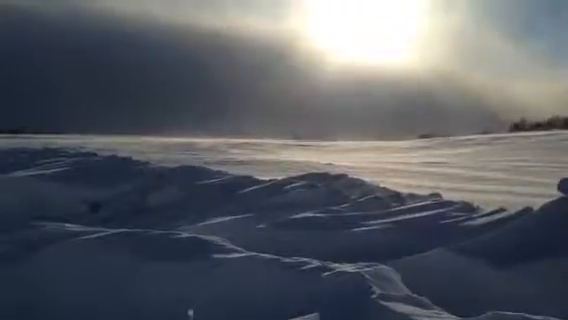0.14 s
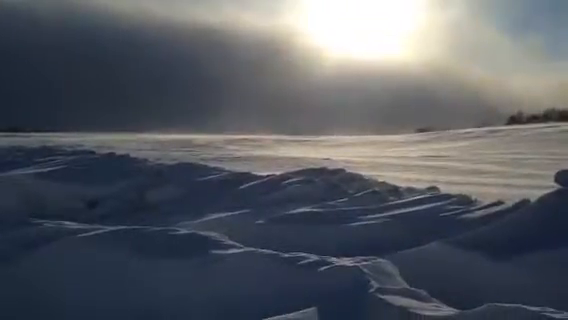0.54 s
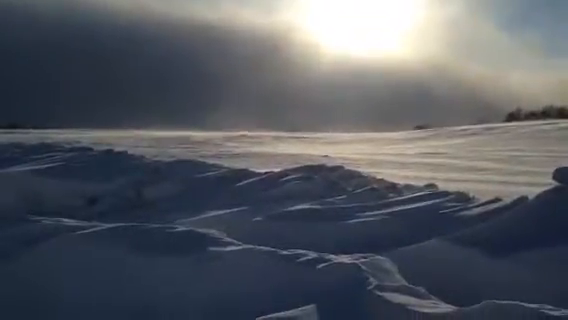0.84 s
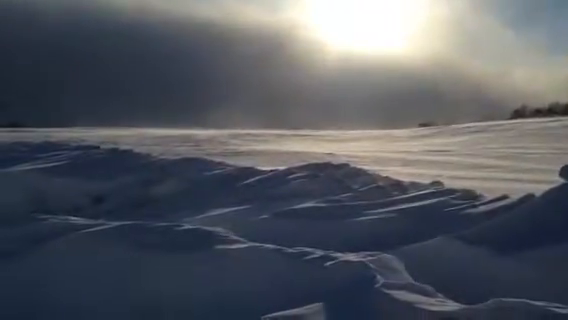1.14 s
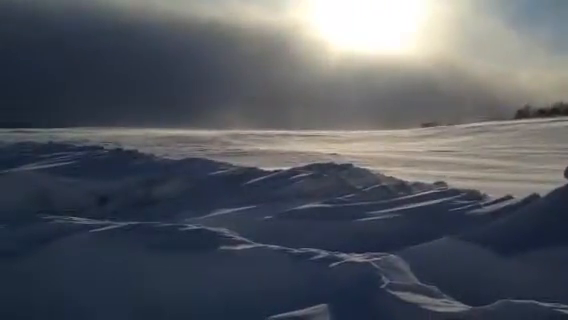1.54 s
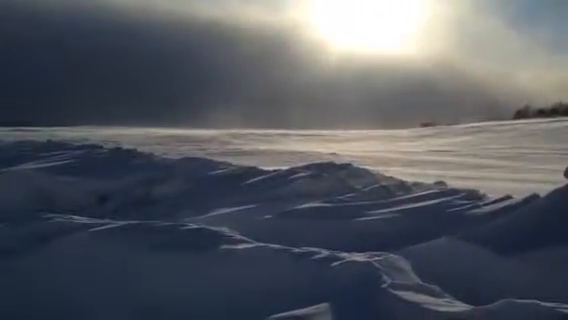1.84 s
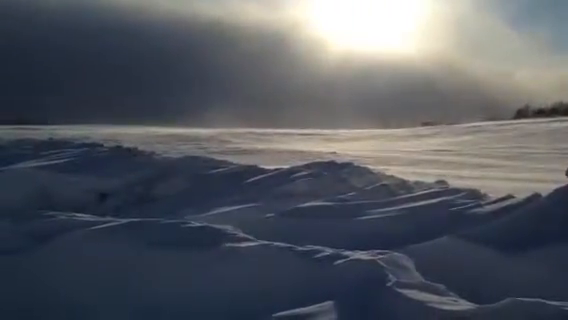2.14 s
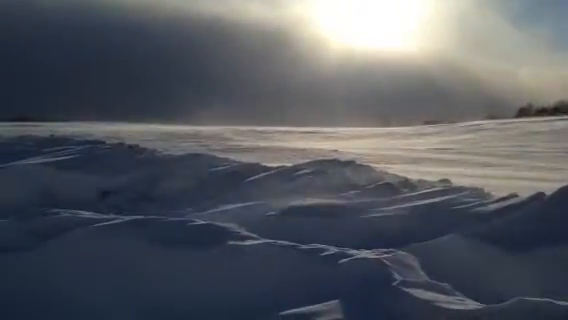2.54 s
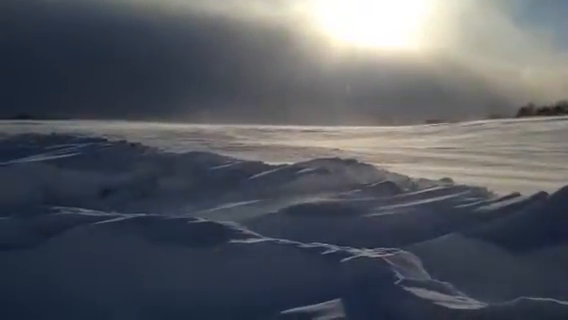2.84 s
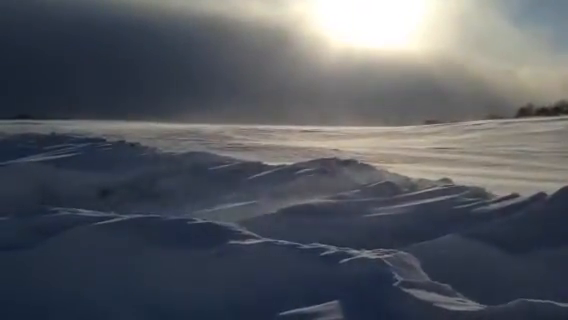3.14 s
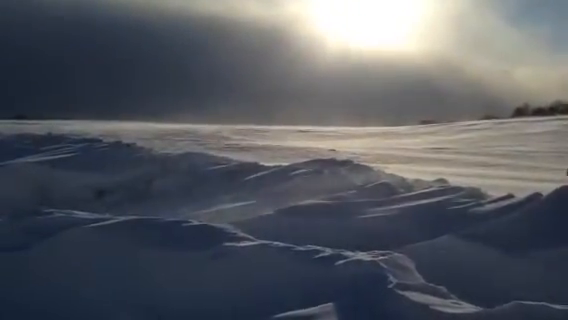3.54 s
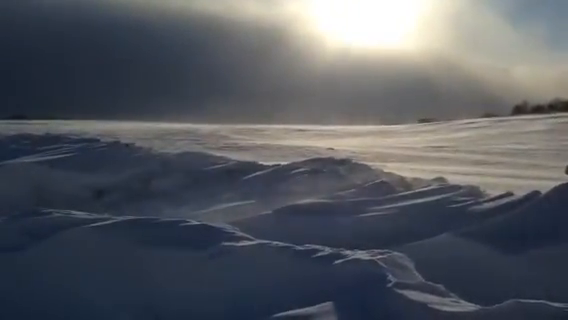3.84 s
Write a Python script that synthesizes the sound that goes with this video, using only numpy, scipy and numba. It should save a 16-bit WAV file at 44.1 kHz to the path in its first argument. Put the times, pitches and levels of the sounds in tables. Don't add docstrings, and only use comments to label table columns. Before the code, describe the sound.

Gusty wind buffets a microphone with low thumps, then blows harder with rough hollow hoots.

```python
import sys
import numpy as np
from scipy import signal
from scipy.io import wavfile
from scipy.ndimage import uniform_filter1d
from numba import njit

SR = 44100
rng = np.random.default_rng(int(sys.argv[2]) if len(sys.argv) > 2 else 0)


def amplitude_ratio(level_db):
    exponent = np.asarray(level_db, float) / 20
    return 10 ** exponent


def log_audio(samples):
    frames = np.atleast_2d(samples).T
    limited = np.clip(frames, -1, 1)
    pcm = np.round(limited * 32767).astype(np.int16)
    wavfile.write(sys.argv[1], SR, pcm)


N = 176400


def curve(rows, col):
    rows = np.array(rows, float)
    return np.interp(np.arange(N) / SR, rows[:, 0], rows[:, col])


def unit(x):
    return x / np.sqrt(np.mean(x ** 2))


def white():
    return rng.standard_normal(N)


def walk(rate_hz):
    hold = int(SR / rate_hz)
    levels = rng.standard_normal(N // 200)[:N // hold + 1]
    steps = np.repeat(levels, hold)
    return 0.83 * uniform_filter1d(uniform_filter1d(steps, hold), hold)[:N]


def low(x, hz, order=4):
    return signal.sosfilt(signal.butter(order, hz, fs=SR, output="sos"), x)


@njit
def svf(x, hz, width_hz):
    y, band_state, low_state = np.empty(len(x)), 0., 0.
    for i in range(len(x)):
        g = np.tan(np.pi * hz[i] / SR)
        damping = width_hz / hz[i]
        v = (band_state + g * (x[i] - low_state)) / (1 + g * (g + damping))
        band_state = 2 * v - band_state
        low_state += 2 * g * v
        y[i] = damping * v
    return y


def band(x, hz, width_hz):
    return svf(x, np.clip(hz * np.ones(N), 20, .45 * SR), float(width_hz))


def band2(x, hz, width_hz):
    return band(band(x, hz, width_hz), hz, width_hz)


@njit
def puffs(at_s, hz, cycles, size, phase):
    y = np.zeros(N)
    for e in range(len(at_s)):
        sigma_s = cycles[e] / hz[e] / 3
        first = max(0, int((at_s[e] - 4 * sigma_s) * SR))
        last = min(N, int((at_s[e] + 4 * sigma_s) * SR))
        for i in range(first, last):
            u = i / SR - at_s[e]
            bell = np.exp(-.5 * (u / sigma_s) ** 2)
            y[i] += size[e] * bell * np.sin(2 * np.pi * hz[e] * u + phase[e])
    return y


def bells(at_s, db, sigma_s):
    t = np.arange(N) / SR
    return sum(amplitude_ratio(d) * np.exp(-.5 * ((t - a) / sigma_s) ** 2) for a, d in zip(at_s, db))


# time in seconds, buffet level in dB.
GUST = [(0.0, -32.5), (0.31, -32), (0.49, -29.5), (0.82, -34.5), (1.26, -35.5), (1.5, -26), (1.67, -24),
        (1.97, -29), (2.08, -26), (2.33, -30.5), (2.74, -28), (3.13, -28), (3.27, -28.5), (3.54, -25.5),
        (3.66, -30), (3.81, -28.5), (4.0, -31.5)]


def buffet():
    eddies_per_s, centre_hz, scatter_db, cycles = 330, 135, 3, 1.5
    gap, pitch, size, phase = rng.random((2400, 4)).T
    at_s = np.cumsum(-np.log(gap)) / eddies_per_s
    hz = centre_hz * np.exp(0.59 * 2.68 * (pitch - .5))
    size = amplitude_ratio(-scatter_db * np.log(size))
    small = puffs(at_s, hz, cycles + 0 * at_s, size, 2 * np.pi * phase)
    return unit(small) * amplitude_ratio(curve(GUST, 1) + 1.0)


# frequency in Hz, density in dB per Hz.
SNOW_SPECTRUM = [(200, -10.5), (600, -13), (1050, -8.5), (1700, -28), (3000, -30.5), (5000, -44.5),
                 (9000, -59)]
# time in seconds, level in dB.
SNOW_LEVEL = [
    (0, -45.5),
    (1.2, -46),
    (1.8, -49.5),
    (2.5, -52),
    (2.7, -47),
    (3.2, -55),
    (4, -66.5),
]


def snow():
    hz_table, db_table = np.array(SNOW_SPECTRUM, float).T
    out, swell = 0, walk(2.4)
    for hz in 200 * 2 ** np.arange(0, 5.5, 1 / 3):
        db = np.interp(np.log(hz), np.log(hz_table), db_table) + 10 * np.log10(hz)
        noise = low(band2(white(), hz, hz / 3), 1.19 * hz)
        out = out + unit(noise) * amplitude_ratio(db + 1.3 * swell + 0.66 * walk(11.0))
    return unit(out) * amplitude_ratio(curve(SNOW_LEVEL, 1))


# centre in Hz, width in Hz, level in dB.
SELF_NOISE = [(5460, 5400, -80), (8300, 8200, -88.5), (12200, 11000, -85), (14000, 3000, -83)]


def self_noise():
    hiss = sum(amplitude_ratio(db) * unit(band2(white(), hz, width_hz)) for hz, width_hz, db in SELF_NOISE)
    gain_db = curve([(0, 3.5), (1.2, 0.5), (2.0, 3.5), (2.58, 6), (2.63, -2), (4, 1)], 1)
    return hiss * amplitude_ratio(gain_db)


# time in seconds, peak in dB, pitch in Hz.
EDDIES = [(0.056, -24.5, 91), (0.099, -13.5, 136), (0.1, -14, 230), (0.128, -28, 443),
          (0.128, -20.5, 199.4), (0.142, -10.5, 205.6), (0.156, -19.5, 118.3), (0.314, -21, 215),
          (0.316, -15, 102), (0.495, -13, 236.7), (0.499, -32, 108), (0.536, -21, 110),
          (0.541, -12, 210), (0.542, -31.5, 362), (0.588, -19, 113), (0.649, -24, 402),
          (0.652, -9.5, 224), (0.662, -18, 110), (0.663, -21, 360), (0.678, -12.5, 231.6),
          (1.352, -10, 118.1), (1.356, -22, 205), (1.375, -12.5, 108),
          (1.464, -20, 92), (1.612, -16, 133.6), (1.707, -29, 126), (1.708, -15, 235),
                 (1.709, -17.5, 383), (1.753, -13, 92), (1.776, -12.5, 259), (1.78, -17, 130.6),
                 (1.809, -8.5, 85), (1.842, -17, 506), (1.857, -16, 252), (1.994, -11.5, 380),
                 (1.995, -13, 264), (1.999, -35.5, 134.3), (2.032, -15.5, 502), (2.051, -17.5, 104),
                 (2.06, -16.5, 420), (2.083, -12, 107), (2.085, -16, 465), (2.105, -16, 217),
                 (2.133, -18, 120), (2.136, -12, 217.7), (2.172, -15, 107), (2.389, -12, 201),
                 (2.39, -17.5, 90), (2.433, -12.5, 224.4), (2.482, -15, 242), (2.5, -16, 117),
          (2.591, -16, 91.4), (2.594, -21, 450), (2.617, -12.5, 135.6), (2.653, -11, 104),
               (2.664, -11.5, 263), (2.688, -16, 305.4), (2.709, -11, 95.4), (2.711, -5, 229.3),
               (2.737, -10, 192), (3.031, -7.5, 121.3), (3.04, -11.5, 217), (3.067, -2, 236.4),
               (3.085, -4.5, 261), (3.117, -10, 231), (3.229, -7, 217.7), (3.53, -11.5, 273),
               (3.574, -12.5, 229.3), (3.576, -17, 136.6), (3.589, -10.5, 241), (3.707, -20.5, 217),
               (3.71, -15.5, 126), (3.742, -15, 116.5), (3.776, -9.5, 232.5), (3.848, -13.5, 245),
          (0.89, -23, 205), (0.892, -26.5, 91), (0.948, -27, 90), (1.003, -20, 148), (1.15, -29, 85),
                (1.245, -24, 130), (1.452, -20, 300), (1.565, -20, 392), (1.738, -16.5, 80),
                (1.888, -20, 303), (2.35, -27, 394), (2.255, -18, 89), (2.443, -19, 530),
                (2.545, -19.5, 300), (3.9995, -16.5, 208)]


def eddies():
    delay_s, trim_db, cycles = .0001, 1.5, 1.233
    wake_db, wake_s, wake_top_hz = -20.5, 0.011, 620
    s, db, hz = np.array(EDDIES).astype(float).T
    phase = 2 * np.pi * rng.random(90)[:len(s)]
    thumps = puffs(s + delay_s, hz, cycles + 0 * s, amplitude_ratio(db + trim_db), phase)
    fine = low(band(white() * amplitude_ratio(8.3 * walk(90)), 290, 200), wake_top_hz)
    wake_level = bells(s, db, wake_s) + 1.75 * amplitude_ratio(curve(GUST, 1))
    return thumps + unit(fine) * amplitude_ratio(wake_db) * wake_level


# time in seconds, peak in dB, low modes in dB.
TICKS = [
    (0.2516, -58, -26),
    (0.2712, -47, -9.5),
    (0.8179, -57, -15),
    (1.5308, -60, -17.5),
    (2.2696, -51.5, -2),
    (2.2961, -47.5, -8),
    (2.3626, -68, -9),
    (3.0514, -19, -3.5),
    (3.079, -57, -4),
]
# centre in Hz, width in Hz, level in dB.
CASE = [(2140, 800, 14.5), (2970, 830, 6), (4900, 1400, 3), (3940, 980, 5.5), (6900, 1500, -1),
        (11400, 1700, 2.5), (13900, 1700, 1.5)]


def ticks():
    delay_s, spread_s = 0.0005, .0007
    high_drive, low_drive = np.zeros(N), np.zeros(N)
    for (s, db, low_db), r in zip(TICKS, rng.random((16, 5))):
        i = (SR * (s + delay_s + spread_s * np.sort(r))).astype(int)
        np.add.at(high_drive, i, amplitude_ratio(db) * (0.36 + 0.13 * r) * np.array([1, -1, 1, -1, 1]))
        low_drive[i[0]] += amplitude_ratio(db + low_db)
    out = np.zeros(N)
    for hz, width_hz, db in CASE:
        drive = high_drive if hz > 6000 else low_drive
        out += amplitude_ratio(db) * band(band(drive, hz, width_hz), hz, 2 * width_hz)
    return amplitude_ratio(18.5) * out


# time in seconds, peak in dB.
SLAPS = [(1.9864, -36.5), (2.0383, -43), (2.4415, -42), (2.6179, -37.5), (2.6561, -31.5), (2.8643, -27),
         (2.9033, -25.5), (2.9257, -30), (3.0412, -20), (3.0447, -16.5), (3.0702, -23), (3.092, -25.5),
         (3.0751, -16), (3.0797, -13), (3.5605, -35), (3.6151, -30.5), (3.7061, -26.5), (3.7754, -20)]


def slaps():
    base_hz, cycles, spray_s = 796, 0.87, 0.0013
    s, db = np.array(SLAPS, float).T
    phase, pitch = rng.random((30, 2))[:len(s)].T
    noise = white()
    spray = unit(low(band(noise, 1400, 1100), 2100)) * amplitude_ratio(-11.0)
    spray += unit(low(band(noise, 3200, 2400), 6900)) * amplitude_ratio(-33)
    hz = base_hz * (1 + 0.24 * pitch)
    cracks = puffs(s + 0.0014, hz, cycles + 0 * s, amplitude_ratio(db + 8.5), 2 * np.pi * phase)
    return cracks + bells(s + .0015, db, spray_s) * spray


# time in seconds, peak in dB, pitch in Hz.
KICKS = [(2.589, -16.5, 356), (2.618, -6.5, 507), (2.656, -6.5, 561), (2.696, -14.5, 464), (2.712, -6, 609),
         (2.8, -21.5, 550), (2.822, -19, 536), (2.852, -8, 655), (2.95, -9.5, 479), (2.997, -13, 508),
         (3.024, -8.5, 353), (3.048, -8.5, 454), (3.074, -6.5, 403), (3.142, -14, 461), (3.179, -15, 452),
         (3.211, -9, 452), (3.244, -16.5, 499), (3.316, -22, 591), (3.371, -13, 470), (3.442, -17, 424),
         (3.473, -10, 504), (3.531, -15, 361.4), (3.556, -9, 433.5), (3.595, -9, 489), (3.66, -15, 532.5),
         (3.705, -18.5, 641), (3.755, -10.5, 481), (3.827, -17.5, 498), (3.882, -14.5, 424),
         (3.957, -14.5, 545)]


def kicks():
    rise_s, fall_s, trim_db, air_db = 0.00072, 0.01, -3.5, -13.5
    out, t = np.zeros(N), np.arange(int(.08 * SR)) / SR
    shape = (1 - np.exp(-t / rise_s)) * np.exp(-t / fall_s)
    shape /= shape.max()
    noise = rng.standard_normal(N + len(t))[:N]
    air = unit(low(band(noise, 620, 590), 960))
    for (s, db, hz), turn in zip(KICKS, rng.random(60)):
        i = int(s * SR)
        n = min(len(t), N - i)
        tone = np.sin(2 * np.pi * (hz * t[:n] + turn))
        out[i:i + n] += amplitude_ratio(db + trim_db) * shape[:n] * (tone + amplitude_ratio(air_db) * air[i:i + n])
    return low(out, 1300, order=2)


# time in seconds, level in dB.
BLOWS = [
    [(2.59, -48.5), (2.618, -12.5), (2.726, -15), (2.812, -24.5), (2.852, -18), (2.92, -18.5), (3.006, -14),
     (3.08, -17.5), (3.11, -21.5)],
    [(3.166, -24), (3.228, -21.5), (3.316, -22.5), (3.39, -24), (3.438, -21.5), (3.478, -18), (3.518, -32)],
    [(3.57, -16.5), (3.608, -16), (3.636, -21), (3.664, -18), (3.685, -27), (3.772, -14), (3.83, -22.5),
     (3.94, -21), (3.97, -24)],
]
# time in seconds, pitch in Hz.
CAVITY = [(2.6, 491), (2.78, 495), (2.86, 620), (3.0, 519), (3.15, 484.4), (3.46, 417), (3.56, 468),
          (3.66, 695), (3.76, 581), (3.88, 427.4), (4, 469)]


def port():
    hoot_width_hz, hoot_top_hz, wander, flutter_db = 80, 880, .055, 5.0
    effort_db = uniform_filter1d(curve(np.vstack([[(2.5, -72.5)], *BLOWS]), 1), size=400)
    steady_db = uniform_filter1d(effort_db, size=3000)
    hz = curve(CAVITY, 1) * np.exp(wander * walk(30))

    air = white() * amplitude_ratio(flutter_db * walk(75))
    hoot = unit(low(band(band(air, hz, hoot_width_hz), hz, 650), hoot_top_hz))
    wide = unit(low(band(white() * amplitude_ratio(8.1 * walk(60)), 0.85 * hz, 240), 760))
    body = unit(low(band(white() * amplitude_ratio(5.1 * walk(34)), 230, 250), 500))

    spit = white() * amplitude_ratio(4.0 * walk(120))
    skirt = unit(band(band(spit, 1.3 * hz, 300), 1.37 * hz, 300)) * amplitude_ratio(-18)
    skirt += unit(low(band(spit, 1100, 900), 2000)) * amplitude_ratio(-32)
    skirt *= amplitude_ratio(0.2 * (effort_db + 15.0))
    haze = unit(low(band(spit, 2600, 1900), 5000)) * amplitude_ratio(-66.0 + 0.59 * (steady_db + 18))
    return (hoot * amplitude_ratio(-2) + wide * amplitude_ratio(-10) + body * amplitude_ratio(-9) + skirt) * amplitude_ratio(effort_db) + haze


def scene():
    wind = buffet() + eddies() + port() + slaps()
    return (wind + ticks() + snow() + self_noise() + kicks())[None]


def roll_off(x):
    return signal.sosfilt(signal.butter(12, 15440, fs=SR, output="sos"), x)


def record(dry):
    bass_cut = signal.butter(3, 45, "high", fs=SR, output="sos")
    x = signal.sosfilt(bass_cut, dry)
    return roll_off(0.87 * np.tanh(x / 0.96))


dry = scene()
out = record(dry)
log_audio(out)
```